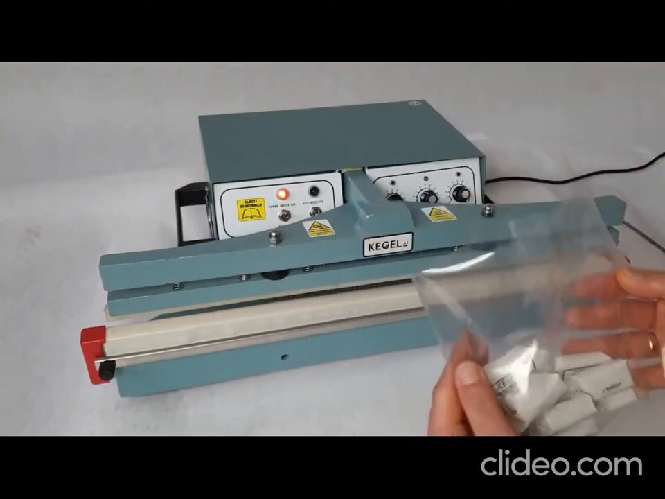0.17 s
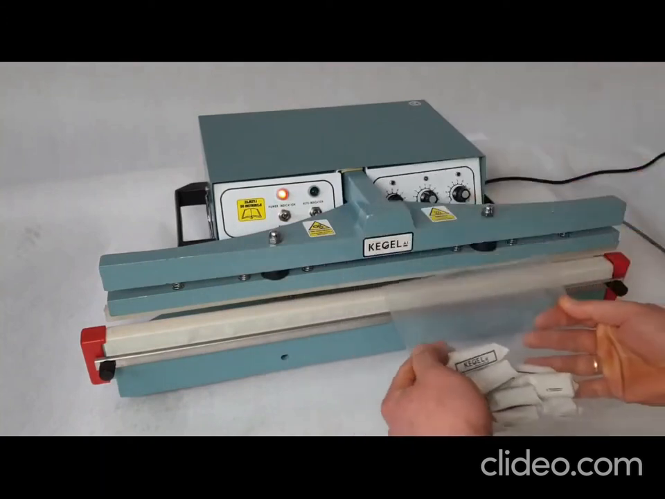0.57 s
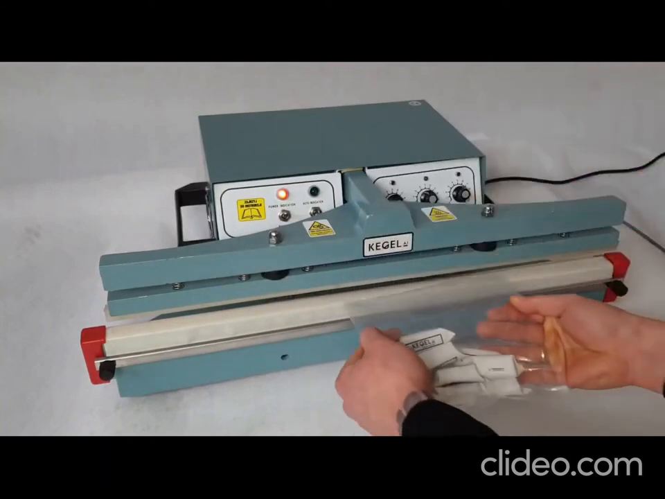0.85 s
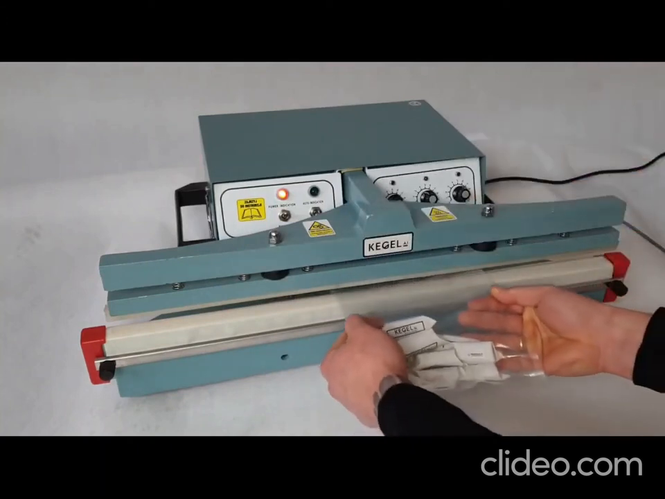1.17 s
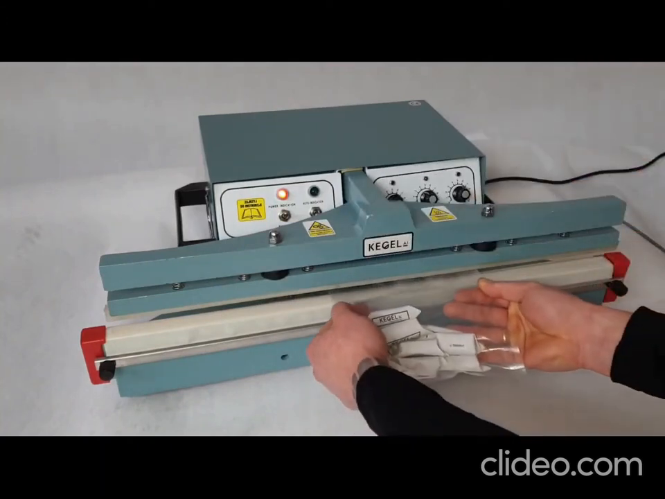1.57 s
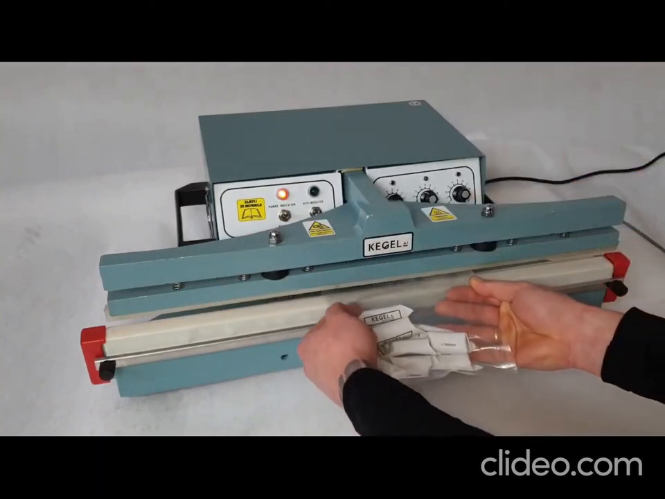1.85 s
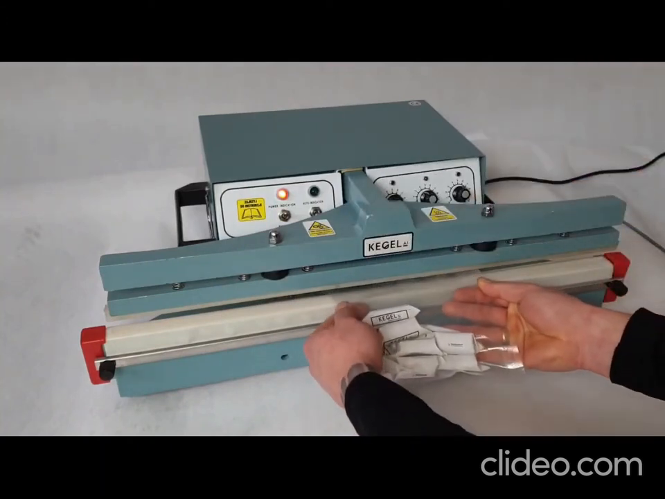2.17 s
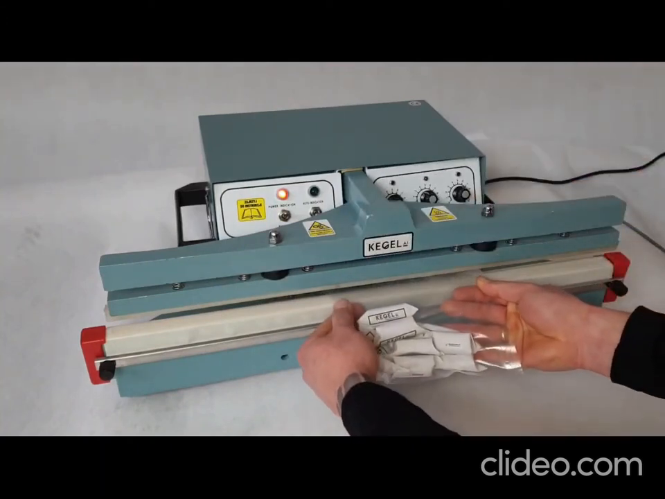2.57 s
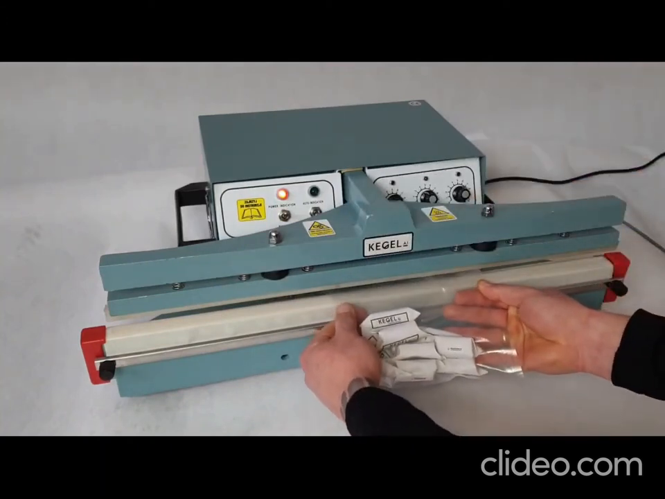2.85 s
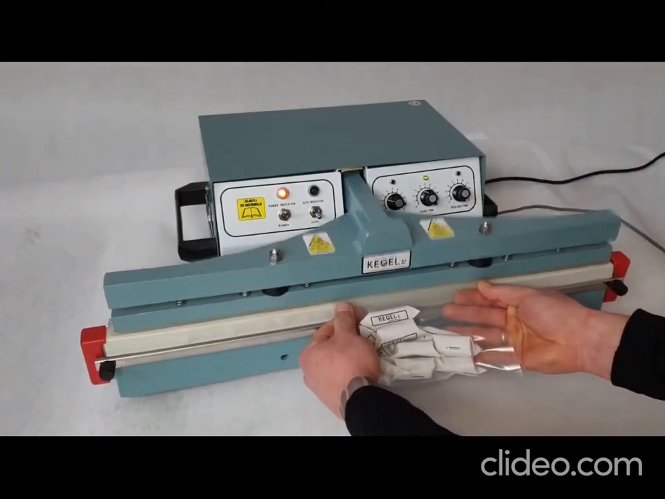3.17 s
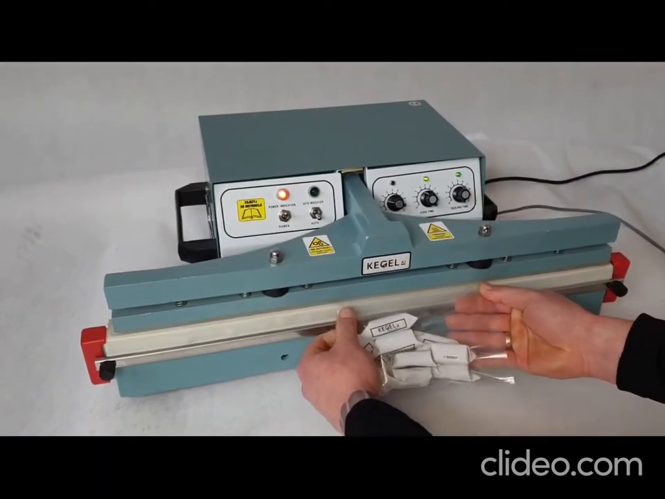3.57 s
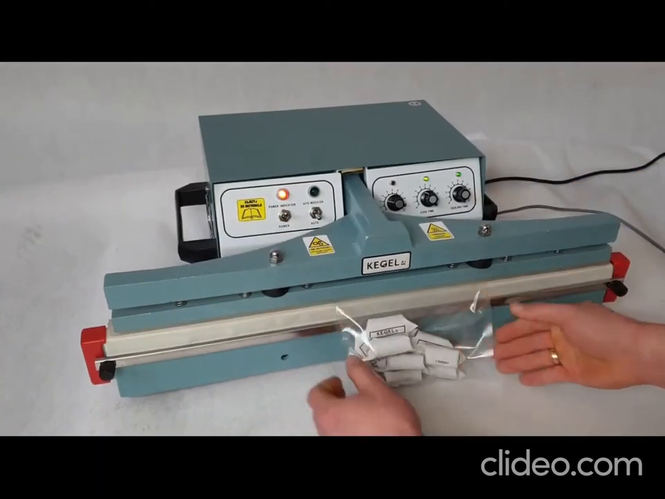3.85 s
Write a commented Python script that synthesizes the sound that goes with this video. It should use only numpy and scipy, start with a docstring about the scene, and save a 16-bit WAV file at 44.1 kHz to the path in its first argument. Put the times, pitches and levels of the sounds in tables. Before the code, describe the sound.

A tabletop bag sealer in a hard-walled room, closely miked over faint hum. Plastic film rustles and snaps sharply with dull bumps from 0 to 1.2 seconds, then quietens. Small clicks and faint metallic creaks come around 1.5 to 2.8. At 3.05 the linkage pings and scrapes, and at 3.27 the jaw slams very loudly, with clattering, ringing metal. The rattle fades under low hum as the bag crackles until 4.

```python
"""A tabletop bag sealer in a hard-walled workroom with a faint hum, made from filtered noise and sine waves.
First hands lay a bag on the lower jaw: noise grains rustle, short bursts snap and low noise bumps.
A soft swell near 1 kHz comes and goes, switches click, then the linkage creaks (resonant noise) and pings.
The upper jaw slides down and slams: dying sines and noise bands make the blows, crash and rattling tail.
After the slam the heater hums in steady tones and the bag rustles and ticks again."""
import sys
import numpy as np
from scipy import signal
from scipy.fft import rfft, irfft, next_fast_len
from scipy.io import wavfile

SR = 44100
rng = np.random.default_rng(int(sys.argv[2]) if len(sys.argv) > 2 else 0)


def transcribe(u):
    """Save the signal u as a 16-bit wav file named by the first command-line argument.

    u: samples, shape (n,) or (channels, n), limited to [-1, 1]; the rate is SR.
    q: integer samples, one column per channel.
    """
    v = np.clip(np.atleast_2d(u).T, -1, 1)
    q = np.round(v * 32767).astype(np.int16)
    wavfile.write(sys.argv[1], SR, q)


N = 176400
T = np.arange(N) / SR  # time of every sample, in s

# All source levels are those ahead of the recorder. A t60 is the time to fall by 60 dB.
# Room tone: pitch_hz, colour_db (relative, per Hz)
ROOM_TONE_COLOUR = [(25, 3), (64, -2.5), (130, -4), (200, -1.5), (280, -1), (400, 2.5), (500, -2),
                    (730, -7), (960, -23.5), (1190, -25), (2500, -26), (4900, -30), (5700, -26),
                    (7200, -27.5), (9000, -45), (12000, -29), (15000, -31), (18000, -48)]
ROOM_TONE_DB = -60.5
# Left-right likeness of room and hands: pitch_hz, likeness (0 unrelated, 1 the same)
LIKENESS = [(60, 0.93), (120, 0.57), (200, 0.6), (400, 0.93), (700, 0.24), (1300, 0), (4400, 0.024),
            (8000, 0.7), (15000, 1)]
# Lean to the left: pitch_hz, left_over_right_db
LEAN = [(60, 3.5), (240, 1.5), (950, 2.5), (3770, 2.0), (15000, 2.5)]
# Faint hum: pitch_hz, level_db
HUM = [(199.5, -77), (263, -56.5), (300, -62), (399, -75.5), (485, -70)]
HUM_WAVER_DB = 1.1
# Low bumps while the bag is moved: time_s, level_db
HANDLING = [(0.0, -53.5), (0.118, -79), (0.182, -50), (0.378, -68), (0.432, -51.5), (0.492, -62.5),
            (1.1, -75)]
# Rustle of the bag, two stretches: time_s, level_db
RUSTLE = [
    [(0, -51), (.08, -61), (.15, -57), (.25, -57.5), (.34, -59), (.45, -65), (.53, -74.5), (.57, -56.5),
     (.73, -55.5), (.8, -56.5), (.9, -64), (1.05, -66.5), (1.11, -73), (1.16, -60), (1.22, -73), (1.3, -93)],
    [(3.4, -52), (3.46, -48.5), (3.6, -62), (3.75, -72), (3.83, -46), (3.88, -60.5), (3.94, -48), (4, -59)],
]
# Colour of the rustle: pitch_hz, colour_db (relative, per Hz)
RUSTLE_COLOUR = [(150, -14), (250, -2.5), (452, -4.5), (493, -20), (1450, -9.5), (4120, -14), (6140, -11.5),
                 (8120, -21.5), (11500, -23), (16000, -30)]
GRAINS_PER_S, GRAIN_SPREAD_DB = 1500, 1.5
# Snaps of the plastic bag: start_s, upper_mid_peak_db, then bass_db, mid_db, treble_db (against the
# upper mids), pan_db (left over right), length (multiplies the band t60)
SNAPS = [(0.055, -44.5, -8, 1, -26, 4, 0.99), (0.1045, -22, -18, -8.5, -4, 7.5, 0.74),
         (.1098, -41, -7, -5, -14, 4, .8), (0.122, -35.5, -12, -2.5, -5, -10, 1),
         (0.1378, -51, -6, 12, -21, 6, 0.74), (0.1687, -47.5, -4, 12.5, -15, -4, 0.98),
         (0.1814, -35, -3, 2, -5, 9.5, 0.99), (0.1868, -40.5, -9, 3, -21, -9, 1),
         (0.2102, -49, 2, 5, -12, -2, 1), (0.2128, -44.5, 2, 2, -6, 3, 0.94),
         (0.233, -50, 6, 0, -16, 1, 0.71), (0.259, -50, 2, 4, -24, 0.5, 0.79),
         (0.282, -55, 12.5, -8, -14, 0, 0.68), (0.2978, -36.5, -4, -1.5, -22, -3, 0.98),
         (0.317, -47, 7.5, -10, -18, 3, 0.83), (0.4047, -58, 15.5, -1, -14, 6, 1),
         (0.4184, -59, 10.5, 3, -33, 6, 0.88), (0.5414, -39, -3.5, -3, 5.5, -5, 0.95),
         (0.5474, -36, -14, -8, -4.5, 18, 0.8), (0.582, -41.5, 4, -1, -23, 3, 1),
         (0.6017, -35, -8, 4.5, -15, 5.5, 1), (0.6109, -41, 3, -11, -10, 4, 1),
         (0.6206, -39, -6, -3, -14, -7, 0.8), (0.648, -24.5, -16, -6.5, -8.5, 2.5, 1),
         (0.6524, -35, -6, -12, -13, 4, 0.8), (0.6712, -47, 8, 8, -12, -2.5, 0.7),
         (0.674, -43, 9, 10, -12, 5, .8), (0.678, -48, 4, 7.5, -14, 3, 0.63),
         (0.698, -50, -2, 10, -15, 9, .8), (0.7072, -24.5, -4.5, -12, 3, 1.5, 0.81),
         (0.712, -29, -22, -25, 4, 19, 0.99), (0.7198, -30, -3, -4.5, -20, -3, 0.78),
         (0.7235, -38, -14, -0.5, -17, 13, 1), (0.7262, -44, -3, 0, -12, 7, .9),
         (0.7385, -29.5, -14, -2.5, -13, 2, 0.99), (0.7544, -49, 1, -17, -19, -4, 0.87),
         (0.8098, -41.5, 5, -2, -23, 2, 0.81), (0.9312, -52, 10, 6.5, -34, -3, 0.97),
         (0.9409, -41, -8, -6, -33, 8, 0.88), (0.9504, -52, 5, 2, -23, 10, 0.94),
         (1.1201, -48.5, -4, -11, -14, 6, 1), (1.1506, -34.5, -23, -29, -7, 0, 0.49),
         (1.1619, -35.5, -16, -43, -22, 8, 1), (1.1938, -50, -4, -26, 2, 7, 1),
         (3.5499, -39, 6, -3, -8, 7, 1), (3.6282, -31.5, -3, -1, -7.5, 4, 1),
         (3.7567, -32, -19, -3.5, -8, -2, 0.98), (3.7609, -35.5, -15, -23, -3.5, 19, 0.83),
         (3.8242, -27.5, -18, -4, 4.5, 7.5, 1), (3.8338, -46.5, -8, 13.5, -10, 1, 1),
         (3.899, -46, -16, -2, 7, 10, 0.8)]
# Upper mid, bass, mid and treble of a snap: low_hz, high_hz, t60_s (at length 1)
SNAP_BANDS = [(3500, 7800, 0.029), (227, 1105, 0.044), (1170, 3120, 0.035), (8400, 14200, 0.022)]
FIRST_INSTANT = 9  # first sample of a burst, against noise of spread 1
RIGHT_LAG_SAMPLES = 1  # snaps, clicks and pings reach the right side later
# A soft swell near 1 kHz: time_s, level_db
SWELL = [(1.2, -98), (1.35, -70.5), (1.6, -67), (1.8, -84), (1.9, -110)]
# Clicks of switches and stops: the same columns as the snaps
CLICKS = [(1.4604, -54.5, -2, -1.5, -13, 4, 0.95), (2.1312, -48, -12, -23, -3, 20, 1),
          (2.2894, -26.5, -32, -6, -14, 1, 0.66), (2.2942, -32.5, -20, -25, -10, 15, 0.78),
          (2.3986, -50, 8.5, -10, -25, 10, 0.55), (2.5168, -38.5, -19, -3, -39, 4, 0.73),
          (2.7208, -69.5, 28, 13, -12, 6, 0.64), (2.7663, -37, -14, 4, -6, 1.5, 0.94),
          (2.7718, -46.5, -15, -24, -1, 23, 0.9), (3.1036, -33, 1.5, 0, -14, 5, 0.9),
          (3.137, -52, 6, 2, -14, 2, 1), (3.1995, -40.5, -13, 14.5, 1, -1, 0.88),
          (3.2725, -15, 0, 6, -2, 14, 0.75), (3.2735, -5.5, -11, 3.5, -5, 5, .8),
          (3.2775, -12, 4, -17, -5, 1, 0.92), (3.2815, -21, 0, 8, -10, 1, 0.64),
          (3.2905, -22, 1, -8, -14, 3, 1), (3.2985, -17.5, -3, 6, -10, 0, 0.9)]
# Upper mid, bass, mid and treble of a click: low_hz, high_hz, t60_s (at length 1)
CLICK_BANDS = [(2570, 8800, 0.029), (204, 1240, 0.021), (1000, 3700, 0.042), (7600, 13200, 0.02)]
# Rubbing of the linkage: time_s, groan_db, low_rings_db, mid_rings_db, high_rings_db, hiss_db
RUB = [
    [(2.07, -92, -89, -80, -71.5, -79), (2.125, -92, -84, -71, -65, -76),
     (2.135, -82, -65, -60.5, -63.5, -62), (2.2, -83, -53.5, -57.5, -63.5, -70),
     (2.28, -86, -58, -60.5, -71, -85), (2.323, -78, -58, -78, -89, -80),
     (2.327, -78, -54, -45.5, -40, -70), (2.37, -84, -51.5, -51, -53.5, -66),
     (2.44, -85, -52.5, -57, -61, -97), (2.56, -84, -60, -62.5, -69, -101),
     (2.7, -88, -65.5, -78.5, -91, -101), (2.8, -93, -65, -69.5, -71.5, -73),
     (2.92, -61, -76, -79, -84, -91), (2.96, -63, -71, -85, -81, -95), (3.055, -59.5, -72, -80, -70, -88),
     (3.058, -78, -80, -58, -36, -50), (3.075, -46.5, -46, -48, -42, -58),
     (3.11, -36.5, -63, -45.5, -43.5, -51.5), (3.15, -44.5, -62, -48, -50.5, -67.5),
     (3.21, -47, -69, -50, -54.5, -62), (3.258, -61, -50, -51.5, -54.5, -68),
     (3.272, -43, -40, -34, -35, -48)],
]
# Resonances of the rubbing metal, in four groups: pitch_hz, width_hz, level_db (relative)
GROAN = [(840, 40, 1), (992, 30, 1), (1075, 50, 0), (1190, 60, -3)]
LOW_RINGS = [(1075, 22, 3), (1222, 30, 0), (1338, 37, -3)]
MID_RINGS = [(2613, 63, 2), (3060, 75, -1), (3346, 54, -2)]
HIGH_RINGS = [(5050, 91, -1.5), (5810, 29, 0), (6220, 43, 1), (6480, 35, -6), (6600, 75, -22)]
RING_FLICKER_DB = 3
GROAN_BED_DB = -10  # broad noise against the groan's resonances
# Broad noise under the rings takes over as the jaw slides: time_s, level_db (against the rings)
RATTLE = [(2.07, -5), (3.07, -5), (3.09, 8), (3.272, 8)]
# The jaw gathers speed: time_s, level_db
RUMBLE = [(3.05, -62), (3.1, -60), (3.18, -52), (3.22, -49), (3.26, -55), (3.272, -35)]
# A catch lets go: start_s, level_db
STRIKES = [(2.131, -55.5), (2.178, -61), (2.326, -44), (3.0575, -34)]
# Ringing of the catch: pitch_hz, level_db (relative), t60_s
PING = [(5040, 0.5, 0.049), (6150, -7.5, .08), (6570, -15, 0.045), (2690, -9.5, 0.16), (3210, -16, 0.043)]
SLAM_S = 3.272
THUD_S = 3.2745
# Table and frame take the weight: pitch_hz, level_db (before softening), t60_s
THUD = [(73.2, -4.5, 0.24), (106.4, -7.5, 0.15), (138.5, -14, 0.17)]
# First contact, then the jaw seats and bounces: start_s, level_db, softness_hz
BLOWS = [(3.2765, -14.5, 1500), (3.281, -7, 780), (3.290, -4, 905), (3.313, -14.5, 600), (3.323, -36, 615)]
# Ringing of the jaw: pitch_hz, level_db (relative, before softening), t60_s
JAW_MODES = [(192, -7.5, 0.21), (246.2, -10.5, 0.31), (315, -10, 0.15), (388, -4, 0.28), (519.6, -4, 0.098),
             (543.4, -3.5, 0.072), (625, -20, 0.069), (777, -27.5, 1), (847, -17.5, 0.26), (900, -21, 0.16),
             (1311, -20, 0.26), (1715, -8.5, 0.062), (1887, -7.5, 0.048), (2655, -18, 0.15)]
# Colour of the first crash: pitch_hz, colour_db (relative, per Hz)
CRASH = [(40, -27), (100, 5.5), (270, -5), (540, -1.5), (800, -7.5), (1400, -11), (2000, -4), (3300, -13),
         (6650, -17), (8200, -23), (16000, -31)]
# Dying away of the crash: pitch_hz, t60_s
CRASH_T60 = [(50, 0.17), (300, 0.32), (600, 0.078), (1200, 0.09), (4000, 0.12), (12000, 0.11)]
CRASH_DB, SLAM_ATTACK_S = -6, 0.0017
GRIT_PER_S, GRIT_DB = 1500, 1.5  # loose parts clatter inside the crash
# Colour of the rattle of panels and room: pitch_hz, colour_db (relative, per Hz)
TAIL = [(24, -46), (40, -9), (69, -2.5), (226, -11.5), (392, 4), (433, -35), (529, -4), (697, -7.5),
        (751, -11), (6650, -26.5), (9000, -36), (16000, -46)]
# Dying away of the rattle: pitch_hz, t60_s
TAIL_T60 = [(50, 1.66), (300, 0.84), (1000, 1.61), (4000, 1.19), (12000, 0.31)]
TAIL_DB = -19.5
# Left-right likeness of crash and tail: pitch_hz, likeness (0 unrelated, 1 the same)
SLAM_LIKENESS = [(60, 1), (290, 1), (640, 0.85), (1400, 0.093), (3100, 0.062), (15000, .05)]
# Panels keep ringing in the tail: pitch_hz, width_hz, level_db (relative)
PANEL_RINGS = [(390, 13, 5.5), (544, 19.6, 3), (746, 12, 0), (311, 22, -3), (187, 12, -2.5),
               (248.5, 14, -4)]
PANEL_DB, PANEL_T60_S, PANEL_BED_DB = -20.5, 1.235, -10
# Mains hum of the heater: pitch_hz, level_db
HEATER = [(101, -52.5), (199.5, -53), (402, -59)]
HEATER_WAVER_DB = 2
ROOM_T60_S, ROOM_DB, WALL_CUT_HZ = 0.39, -15.5, 10000
MIC_LOW_CUT_HZ, CUTOFF_HZ = 58, 16900
# Microphone colour, a lift and a dip: low_hz, high_hz, share
MIC_LIFT = (6070, 7370, 0.44)
MIC_DIP = (6150, 10500, 0.25)
GAIN_KNEE_DB, GAIN_SHARE = -22, 0.27  # share of the dB above the knee that is taken away
GAIN_BACK_DB_PER_S = 4  # fall of the held level, before the share is taken


def amp(db):
    """Turn dB into a gain."""
    return 10 ** (np.asarray(db) / 20)


def rms_one(x):
    """Scale to an average strength (rms) of 1."""
    return x / np.sqrt(np.mean(x ** 2) + 1e-20)


def in_time(curves):
    """Read joined curves at every sample: -120 dB before the first point, the last value held."""
    time_s, *columns = np.transpose([row for curve in curves for row in curve])
    return [np.interp(T, time_s, column, left=-120) for column in columns]


def at_hz(points, hz):
    """Read a table by pitch, on a log-frequency axis."""
    table = np.array(points)
    return np.interp(np.log(hz), np.log(table[:, 0]), table[:, 1])


def drift(rate_hz):
    """Slow random wandering of spread 1: low-passed noise made at every 40th sample."""
    r = np.exp(-80 * np.pi * rate_hz / SR)
    noise = rng.standard_normal(N // 40 + 2002)
    slow = signal.lfilter([1], [1, -2 * r, r * r], noise)[2000:]  # skip the filter's start
    return np.interp(np.arange(N) / 40, np.arange(len(slow)), rms_one(slow))


def band(x, low_hz, high_hz):
    """Keep mostly the pitches between two limits."""
    limits = [low_hz, min(high_hz, .45 * SR)]
    return signal.sosfilt(signal.butter(2, limits, "band", fs=SR, output="sos"), x + 1e-18)


def left_over_right(db):
    """Gains that set the left side this many dB above the right."""
    return amp(db * np.array([[.5], [-.5]]))


def stereo(pair, hz, likeness=LIKENESS):
    """Mix two unrelated signals to the left-right likeness and lean of this pitch."""
    alike = np.clip(at_hz(likeness, hz), 0, 1)
    middle = np.sqrt(1 + alike) * pair[0]
    sides = np.sqrt(1 - alike) * pair[1] * [[1], [-1]]
    return left_over_right(at_hz(LEAN, hz)) * (middle + sides)


def coloured(spectrum, patchy_db, white=None, t60=None):
    """Flickering third-octave noise, rms 1 before any decay; a t60 table fades each band from the slam."""
    out, power = 0, 0
    edges = 25 * 2 ** (np.arange(30) / 3)
    white = rng.standard_normal((2, 2, N)) if white is None else white
    for k, (low, high) in enumerate(zip(edges, edges[1:])):
        hz = np.sqrt(low * high)
        level = amp(at_hz(spectrum, hz) + patchy_db * drift(21.3))
        likeness = SLAM_LIKENESS if t60 else LIKENESS
        part = level * stereo(band(white[k % 2], low, high), hz, likeness)
        power += np.mean(part ** 2)
        if t60:
            part = part * amp(-60 * np.maximum(T - SLAM_S, 0) / at_hz(t60, hz))
        out = out + part
    return out / np.sqrt(power)


def ticks(events, bands):
    """Sharp bursts in four bands, each band with its own strength and decay."""
    size = 3000  # samples in a burst
    out = np.zeros((2, N))
    for start_s, db, *shares_db, pan_db, length in events:
        i = int(start_s * SR)
        burst = rng.standard_normal((4, 2, size))
        burst[:, :, 0] = FIRST_INSTANT
        burst[:, 1] = .8 * burst[:, 0] + .6 * burst[:, 1]  # the right side is much like the left
        burst[:, 1] = np.pad(burst[:, 1], ((0, 0), (RIGHT_LAG_SAMPLES, 0)))[:, :size]
        for noise, (low, high, t60), share_db in zip(burst, bands, (0, *shares_db)):
            fading = noise * amp(-60 * T[:size] / (t60 * length))
            part = band(band(fading, low, high), low, high)
            part = part / np.abs(part).max() * amp(db + share_db) * left_over_right(pan_db)
            out[:, i:i + size] += part[:, :N - i]
    return out


def rings(peaks, low_hz, high_hz, bed_db):
    """Noise through flickering metal resonances over a broad bed of noise."""
    bed = rms_one(stereo(band(rng.standard_normal((2, N)), low_hz, high_hz), low_hz))
    sung = 0
    for hz, width_hz, db in peaks:
        r = np.exp(-np.pi * width_hz / SR)  # a narrow width rings for longer
        poles = [1, -2 * r * np.cos(2 * np.pi * hz / SR), r * r]
        ring = signal.lfilter([1, 0, -1], poles, rng.standard_normal((2, N)))
        level = amp(db + RING_FLICKER_DB * drift(6.4)) * np.sqrt(width_hz)
        sung = sung + level * stereo(rms_one(ring), hz)
    return (amp(bed_db) * bed + rms_one(sung)) / np.hypot(1, amp(bed_db))


def struck(start_s, modes, soft_hz, strengths):
    """Dying sines set off at one moment; a soft contact dulls the high ones."""
    t = np.maximum(T - start_s, 0)
    out = 0
    for (hz, db, t60), strength in zip(modes, strengths):
        softened = strength / np.hypot(1, hz / soft_hz)
        out = out + softened * amp(db - 60 * t / t60) * np.sin(2 * np.pi * hz * t)
    return out


def steady_tones(lines, waver_db):
    """Sines that waver a little in strength and phase, slightly to the left."""
    tones = 0
    for hz, db in lines:
        phase = rng.uniform(0, 7.2) + 0.049 * drift(8.0)
        level = np.sqrt(2) * amp(db + waver_db * drift(4.3))
        tones = tones + level * np.sin(2 * np.pi * hz * T + phase)
    return tones * left_over_right(1.2)


def room_tone():
    """Quiet coloured noise that flickers a little all the time."""
    return amp(ROOM_TONE_DB) * coloured(ROOM_TONE_COLOUR, 1.2)


def faint_hum():
    """A few low, wavering tones all the time."""
    return steady_tones(HUM, HUM_WAVER_DB)


def handling():
    """Dull bumps through the table: low noise that rises and falls."""
    level_db, = in_time([HANDLING])
    thumps = rms_one(band(rng.standard_normal(N), 28, 330))
    return amp(level_db) * (T < HANDLING[-1][0]) * thumps


def rustle():
    """Creasing film: dense, uneven grains of coloured noise."""
    sizes = amp(GRAIN_SPREAD_DB * np.minimum(rng.exponential(1, N), 5))
    sizes = sizes * (rng.random(N) < GRAINS_PER_S / SR)
    grains = rng.standard_normal((2, 2, N)) * (0.3 + sizes)
    level_db, = in_time(RUSTLE)
    between = (T > RUSTLE[0][-1][0]) & (T < RUSTLE[1][0][0])
    level_db = np.where(between, -120, level_db)
    return amp(level_db) * coloured(RUSTLE_COLOUR, 4.0, grains)


def bag_snaps():
    """The plastic snaps: each snap is a short burst of noise."""
    return ticks(SNAPS, SNAP_BANDS)


def swell():
    """A soft, narrow band of noise that comes and goes."""
    level_db, = in_time([SWELL])
    noise = band(rng.standard_normal((2, N)), 907, 1004)
    return amp(level_db) * rms_one(stereo(noise, 950))


def clicks():
    """Switches and stops click: each click is a short burst of noise."""
    return ticks(CLICKS, CLICK_BANDS)


def linkage():
    """Metal parts rub and ring as the jaw is cocked and drops; low noise is the sliding jaw."""
    groan_db, low_db, mid_db, high_db, hiss_db = in_time(RUB)
    rattle_db, = in_time([RATTLE])
    hiss = band(rng.standard_normal((2, N)), 6300, 13800)
    out = amp(hiss_db) * rms_one(stereo(hiss, 10000))
    groups = [(groan_db, GROAN, GROAN_BED_DB), (low_db, LOW_RINGS, rattle_db),
              (mid_db, MID_RINGS, rattle_db), (high_db, HIGH_RINGS, rattle_db)]
    for db, peaks, bed_db in groups:
        hz = [peak[0] for peak in peaks]
        out = out + amp(db) * rings(peaks, 0.8 * min(hz), 1.18 * max(hz), bed_db)
    rumble_db, = in_time([RUMBLE])
    rumble = amp(rumble_db) * rms_one(band(rng.standard_normal(N), 50, 450))
    return (out + rumble) * (T < SLAM_S)


def pings():
    """Each strike sets the catch ringing, every mode with a strength of its own."""
    sides = []
    for _ in range(2):
        side = 0
        for start_s, db in STRIKES:
            side = side + amp(db) * struck(start_s, PING, 20000, rng.normal(1, .3, len(PING)))
        sides.append(side)
    left, right = sides
    return np.array([left, np.roll(right, RIGHT_LAG_SAMPLES)])


def jaw_blows():
    """A thud of table and frame, and blows that set the jaw ringing."""
    out = struck(THUD_S, THUD, 1000, np.ones(len(THUD)))
    for start_s, db, soft_hz in BLOWS:
        signs = rng.choice([-1, 1], len(JAW_MODES))
        out = out + amp(db) * struck(start_s, JAW_MODES, soft_hz, signs)
    return out * left_over_right(1.2)


def crash():
    """Clattering noise that dies away band by band."""
    knocks = amp(GRIT_DB * np.minimum(rng.exponential(1, N), 4))
    knocks = knocks * (rng.random(N) < GRIT_PER_S / SR)
    clatter = .5 + signal.lfilter([1], [1, -.97], knocks)  # each knock fades quickly
    grit = rng.standard_normal((2, 2, N)) * clatter
    return amp(CRASH_DB) * coloured(CRASH, 0.47, grit, CRASH_T60)


def rattling_tail():
    """Long noise of panels and room, with panel resonances that die away."""
    tail = amp(TAIL_DB) * coloured(TAIL, 1.4, t60=TAIL_T60)
    panel_level = amp(PANEL_DB - 60 * np.maximum(T - SLAM_S, 0) / PANEL_T60_S)
    return tail + panel_level * rings(PANEL_RINGS, 180, 1120, PANEL_BED_DB)


def slam():
    """The jaw lands: blows, a crash and a tail; the two noises share one quick rise."""
    onset = np.clip((T - SLAM_S) / SLAM_ATTACK_S, 0, 1)
    return jaw_blows() + onset * (crash() + rattling_tail())


def heater_hum():
    """Mains hum of the heater, on from the slam."""
    return steady_tones(HEATER, HEATER_WAVER_DB) * (T > SLAM_S)


def room(x):
    """Echoes between walls: eight feedback delays a side, duller on every round."""
    size = next_fast_len(N + SR)
    hz = np.arange(size // 2 + 1) * SR / size
    out = []
    for channel in x:
        response = 0
        for k, lag_s in enumerate(rng.uniform(0.01, 0.032, 8)):
            wall = amp(-60 * lag_s / ROOM_T60_S) / (1 + 1j * hz / WALL_CUT_HZ)
            loop = wall * np.exp(-2j * np.pi * hz * lag_s)
            response = response + (-1) ** k * loop / (1 - loop)
        out.append(irfft(rfft(channel, size) * response, size)[:N])
    return amp(ROOM_DB) * np.array(out)


def scene():
    """Add all sources; only the snaps, clicks and pings go through the echoes."""
    steady = room_tone() + faint_hum() + heater_hum()
    small = bag_snaps() + clicks() + pings()
    return steady + handling() + rustle() + small + room(small) + swell() + linkage() + slam()


def record(dry):
    """Microphone colour, then gain that ducks on loud sound and recovers slowly, rounded peaks, top cut."""
    low_cut = signal.butter(4, MIC_LOW_CUT_HZ, "high", fs=SR, output="sos")
    dry = signal.sosfilt(low_cut, dry)
    lift = MIC_LIFT[2] * band(dry, *MIC_LIFT[:2])
    dip = MIC_DIP[2] * band(dry, *MIC_DIP[:2])
    heard = dry + lift - dip
    power = signal.lfilter([.005], [1, -.995], np.mean(heard ** 2, axis=0))
    level_db = 10 * np.log10(power + 1e-12)
    # hold the loudest level so far, letting it fall steadily
    recovery_db = GAIN_BACK_DB_PER_S * T
    held_db = np.maximum.accumulate(level_db + recovery_db) - recovery_db
    ducked = heard * amp(-GAIN_SHARE * np.maximum(held_db - GAIN_KNEE_DB, 0))
    rounded = 1.05 * np.tanh(ducked / 1.05)
    return signal.sosfilt(signal.cheby2(16, 70, CUTOFF_HZ, fs=SR, output="sos"), rounded)


dry = scene()
out = record(dry)
transcribe(out)
```